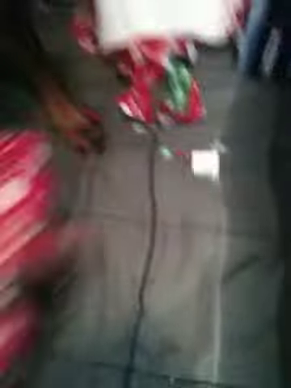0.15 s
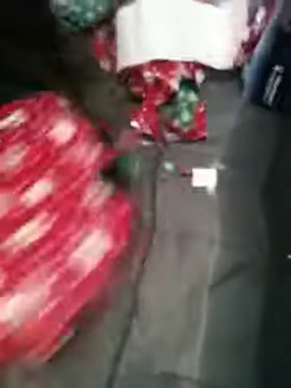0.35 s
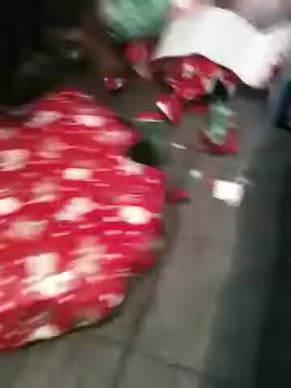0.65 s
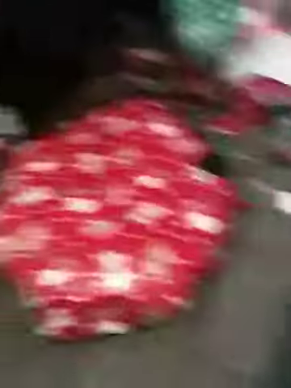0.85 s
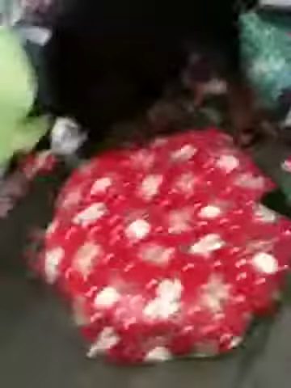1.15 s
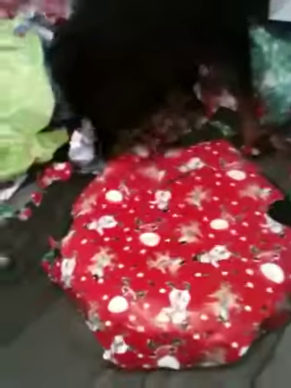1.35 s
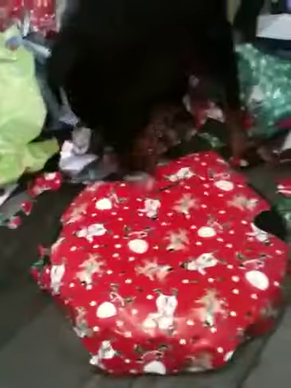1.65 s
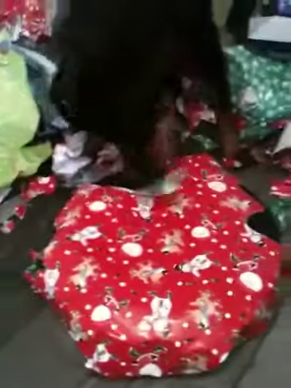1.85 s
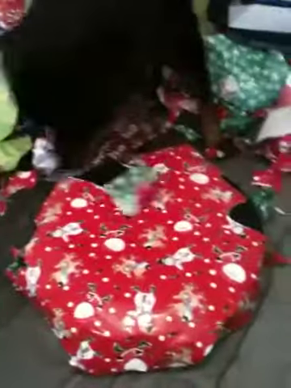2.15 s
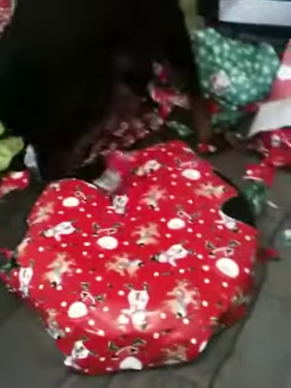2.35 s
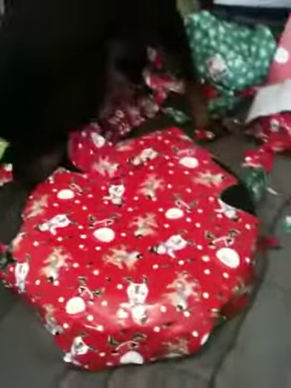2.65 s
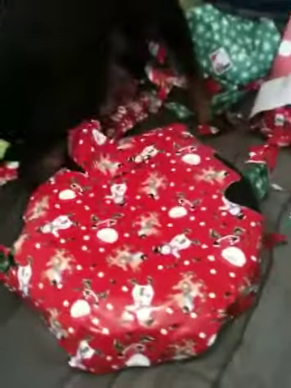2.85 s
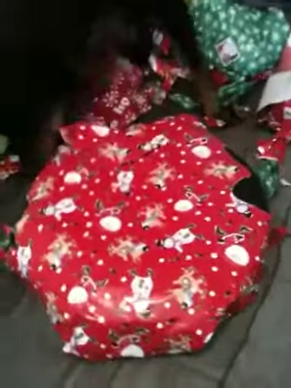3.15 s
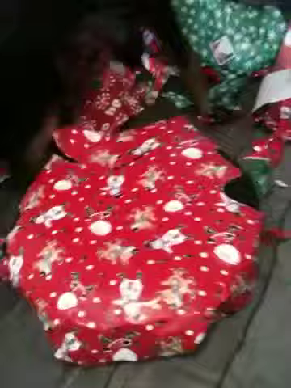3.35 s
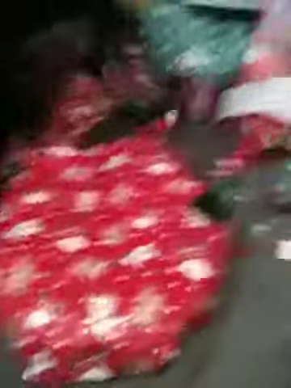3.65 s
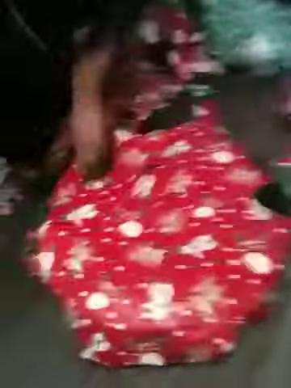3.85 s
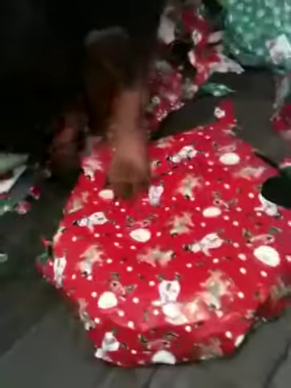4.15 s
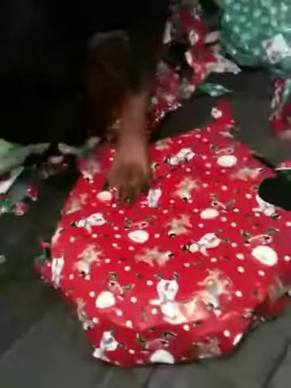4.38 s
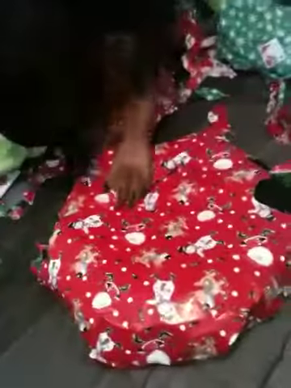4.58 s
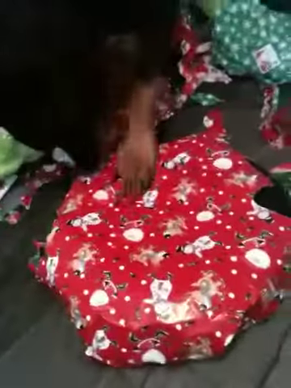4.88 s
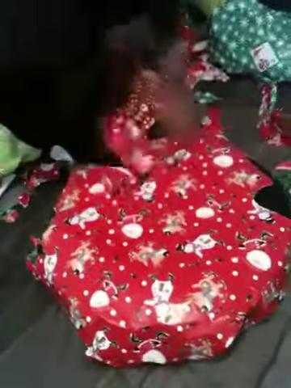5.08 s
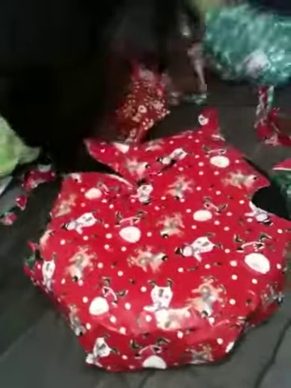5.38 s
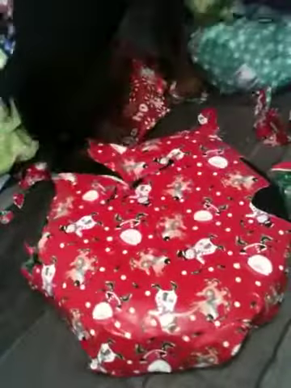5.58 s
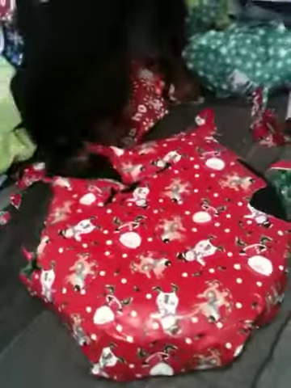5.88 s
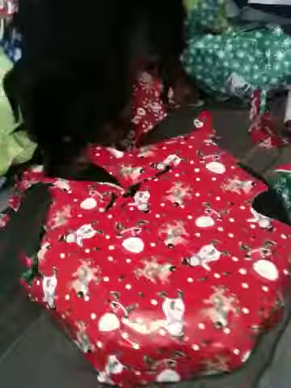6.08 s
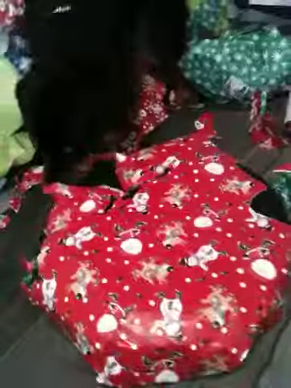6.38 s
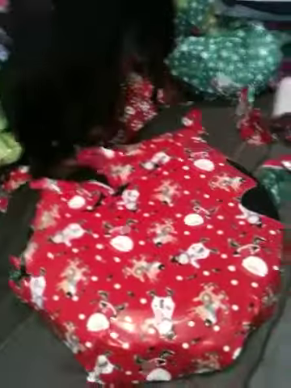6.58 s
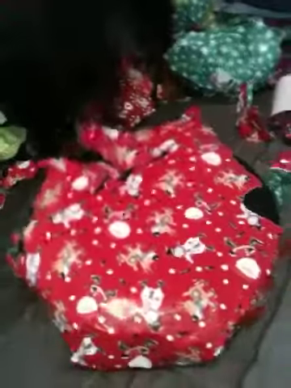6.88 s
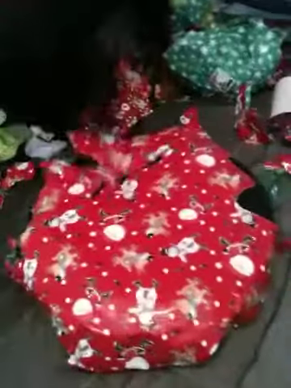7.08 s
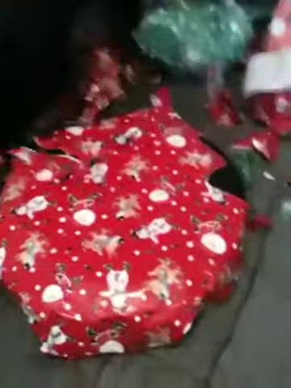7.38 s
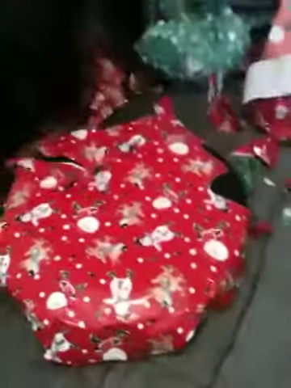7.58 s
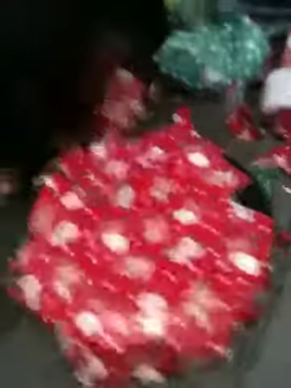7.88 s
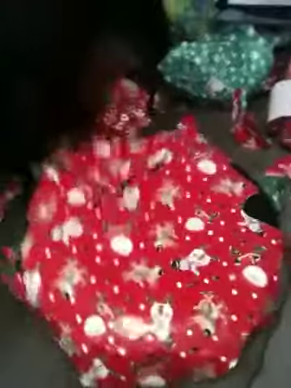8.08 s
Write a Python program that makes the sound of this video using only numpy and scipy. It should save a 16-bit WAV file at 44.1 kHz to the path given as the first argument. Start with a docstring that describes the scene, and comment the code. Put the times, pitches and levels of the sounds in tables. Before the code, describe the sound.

A puppy noses and tears at the wrapping paper of a big present, heard from nearby in a furnished room with little echo. The paper crinkles and snaps right from the start, eases briefly, then crackles and rips from about 1.2 to 2 seconds. After a lull, more crinkles and small pops come from 2.8 seconds onward. The loudest part falls between 4 and 4.6 seconds, when paws slap and crush the taut paper, thumping lightly on the hollow parcel beneath. Short rips and rubbing follow at about 4.7 and 5.1 seconds. Scattered crackles and crease snaps continue to around 7 seconds, go nearly quiet, then return in a last small flurry from 7.8 seconds to just past 8. A faint hiss with a barely audible thin, high electronic whine lies underneath throughout.

```python
"""On a living-room floor, a puppy noses, paws and tears at the wrapping paper of a big present.
The paper crinkles and rips in bursts of tiny cracks, creases snap through and taut folds pop.
Paws slap the stretched sheet, which drums on the hollow parcel beneath.
The furnished room adds a short tail, over a bed of faint hiss and a thin electronic whine."""
import sys
import numpy as np
from scipy import signal
from scipy.io import wavfile
from scipy.ndimage import uniform_filter1d

SR = 44100
rng = np.random.default_rng(int(sys.argv[2]) if len(sys.argv) > 2 else 0)


def wav_out(sig):
    """Save sig, one row per channel (or a flat mono array), as 16-bit PCM at SR to the path in sys.argv[1]."""
    wavfile.write(sys.argv[1], SR, np.round(np.clip(np.atleast_2d(sig).T, -1, 1) * 32767).astype(np.int16))


N = 362943
TIME = np.arange(N) / SR


# rustle bed as the puppy shifts about in the loose paper: (time [s], level [dB])
SHUFFLE_ENVELOPE = [(0, -62.5), (.36, -63), (.55, -66.5), (1.0, -67), (1.45, -63), (1.9, -63), (2.1, -77),
                    (2.7, -86.5), (3.1, -62.5), (3.42, -77), (4.15, -69.5), (4.42, -73), (5.7, -70),
                    (6.2, -66), (6.95, -78.5), (7.2, -81.5), (7.55, -85), (8.2, -61)]
# muzzle and paw strokes that crumple the paper, or rip it when bright:
# (start [s], length [s], level [dB], swell [dB], brightness [dB], push on the parcel [dB re level])
STROKE_CUES = [(0, 0.058, -53.5, -7.5, -4, -4), (0.104, 0.081, -57.5, -2.5, 0, -5),
               (0.214, 0.083, -55, -2, 4.5, -4), (.62, 0.14, -65, -1, -9.5, 3),
               (1.234, 0.11, -54, 10.5, -4.5, -3.5), (1.48, 0.22, -57.5, 7, 4, -5),
               (1.675, 0.17, -53, -6.5, 5, -2.5), (1.849, 0.1, -51.5, -7, 3, -2.5),
               (2.53, 0.012, -67.5, -1, 4, 1.5), (2.87, 0.054, -64.5, -11, -4, -4.5),
               (3.012, 0.035, -58, -6, 4.5, -6), (3.12, 0.11, -54.5, 2, -6.5, -5.5),
               (3.608, 0.028, -54, 3.5, -5.5, -10.5), (3.685, 0.018, -58.5, 0, -0.5, -12),
               (3.884, 0.14, -52.5, 7, -5, -8), (4.022, 0.086, -44.5, 1, -5, -1.5),
               (4.698, .11, -52.5, 5, 6, 3.5), (4.948, 0.074, -63, 3.5, 11, 9),
               (5.059, 0.17, -51.5, 5.5, 1, -5.5), (5.393, 0.038, -63, -3, 6.5, -1),
               (5.485, 0.043, -60, 3, -10.5, -15), (5.57, 0.061, -56.5, -6.5, 0.5, -3),
               (5.786, 0.017, -62, -8, 5, -3.5), (5.882, 0.017, -59, 0, 1, -11),
               (5.978, 0.017, -58.5, 1, -6, -7.5), (6.068, 0.1, -60.5, -7, -9, -13),
               (6.484, 0.014, -56, -1.5, -4, -6), (6.621, .055, -58, -6, -5, -8.5),
               (6.712, 0.02, -50, -4, -11.5, -17), (6.806, 0.033, -48.5, 1.5, -11, -12),
               (6.908, 0.1, -57, -10.5, -3, -4.5), (7.548, .03, -65, -5, -9.5, -7),
               (7.655, 0.056, -66.5, -3.5, -9, -9), (7.807, .04, -53, -3, -7.5, -8.5),
               (7.9, 0.04, -55, 1, -3.5, -29), (8.079, 0.023, -58.5, -7, -3, -17),
               (8.165, 0.026, -59, -3.5, -0.5, -14)]
# the puppy leans on the parcel and rubs it: (start [s], length [s], push [dB])
LEAN_CUES = [(1.99, 0.076, -66), (2.219, 0.029, -66.5), (3.38, 0.22, -73.5), (4.13, .07, -55.5),
             (4.435, 0.034, -64), (7.03, 0.037, -67), (7.475, 0.018, -68.5)]


def handling():
    """The puppy's moves sum to three dB envelopes: crinkle level, brightness and push on the parcel."""
    t = TIME[::40]
    paper_release, push_release = 318.5, 236   # dB per second
    power = from_db(np.interp(t, *np.transpose(SHUFFLE_ENVELOPE))) ** 2
    bright = -2.5 * power   # weighted by power: the loudest move sets the tone
    push = power * from_db(-4.5) ** 2
    for start, length, level_db, swell_db, bright_db, push_db in STROKE_CUES:
        stroke = from_db(level_db) ** 2 * gesture(t, start, length, swell_db, paper_release)
        power += stroke
        bright += stroke * bright_db
        push += from_db(level_db + push_db) ** 2 * gesture(t, start, length, swell_db, push_release)
    for start, length, push_db in LEAN_CUES:
        push += from_db(push_db) ** 2 * gesture(t, start, length, 0, push_release)
    envelopes = 10 * np.log10(power), bright / power, 10 * np.log10(push)
    return [np.interp(TIME, t, envelope) for envelope in envelopes]


def gesture(t, start, length, swell_db, release_db_per_s, attack_db_per_s=483):
    """Power envelope of one move: a quick attack, a hold that swells or slackens, a release."""
    age = t - start
    held_db = swell_db * (np.clip(age / length, 0, 1) - .5)
    fade_db = attack_db_per_s * np.maximum(-age, 0) + release_db_per_s * np.maximum(age - length, 0)
    return from_db(held_db - np.minimum(fade_db, 100)) ** 2


def crinkling(level_db, bright_db, push_db):
    """The harder the paper is pulled, the more cracks a second; the same handling rubs the parcel."""
    per_s = 2400 * from_db(.45 * (level_db + 55))
    cracks = crackle(per_s, spread_db=3.5, clump_db=1.5, clump_hz=130) * from_db(level_db + 3.5)
    sheet = paper(cracks * tautness(), bright_db, scatter_db=3.5, fold_db=1)
    fibres = crackle(per_s, spread_db=3, clump_db=3.5, clump_hz=170) * from_db(level_db + 6)
    sheet += ripping(fibres, bright_db)
    sheet += facets(level_db + 3)
    rubs = crackle(per_s, spread_db=2, clump_db=3, clump_hz=110) * from_db(push_db + 15.5)
    return sheet, parcel(rubs, thud_db=-5, floor_db=-30)


def crackle(per_s, spread_db, clump_db, clump_hz):
    """Tiny cracks in avalanches, many weak and a few strong, with the denser stretches compressed."""
    sizes = from_db(spread_db * np.minimum(rng.exponential(1, N), 5)) * rng.choice([-1, 1], N)
    cracks = sizes * triggers(per_s) * from_db(clump_db * drift(clump_hz))
    slow_power = np.abs(uniform_filter1d(cracks ** 2, size=1800))
    return cracks / np.sqrt(slow_power + 0.029)


# tone of one crack: (frequency [Hz], level [dB])
CRACK_EQ = [(450, -15), (650, -14.5), (900, -5.5), (1300, -5), (1900, 0.5), (2700, -5.5), (3800, 4),
            (5500, -14), (7500, -16.5), (10000, -25), (14500, -18)]
# how far each band follows a crack's brightness: (frequency [Hz], amount [dB per dB])
BRIGHTNESS_TRACKING = [(1300, 0), (3200, 0.52), (7000, 0.97), (13000, 0.79)]
# resonances of the stretched sheet: (frequency [Hz], bandwidth [Hz], level [dB])
SHEET_RESONANCES = [(886, 200, 2.5), (1815, 244, -3.5), (2370, 170, -7), (3860, 1000, -14),
                    (7530, 2400, 2.5)]


def paper(cracks, bright_db, scatter_db=0, fold_db=0):
    """Cracks radiate, coloured by chance and by the shifting folds, then ring in the stretched sheet."""
    direct, at = np.zeros(N), np.flatnonzero(cracks)
    for k, (hz, sos) in enumerate(bands(first=8)):   # 500 Hz and up
        colour_db = scatter_db * rng.standard_normal(N)[at] + fold_db * drift(25)[at]
        tone_db = at_hz(CRACK_EQ, hz) + at_hz(BRIGHTNESS_TRACKING, hz) * bright_db[at]
        band = np.full(N, 1e-18)
        band[at] = cracks[at] * from_db(tone_db + colour_db)
        direct += signal.sosfilt(sos, band) * (-1) ** k
    ringing = 0
    for hz, width, level_db in SHEET_RESONANCES:
        radius = np.exp(-np.pi * width / SR)
        ringing += from_db(level_db) * (1 - radius ** 2) / 2 * resonate(direct, hz, radius)
    return direct + ringing


def ripping(fibres, bright_db, threshold_db=0.5):
    """Parting fibres rasp on the sheet's free edge; the layer fades in on bright strokes."""
    gate = 1 / (1 + from_db(-4 * (bright_db - threshold_db)))
    return filtered(fibres * gate + 1e-18, "band", [2535, 3705])


def facets(level_db, per_s=70, t60_cycles=24.3, count=24):
    """Small facets of the crumpled paper flip at random, each ringing at a pitch set by its size."""
    at = np.flatnonzero(triggers(per_s))
    gains = from_db(level_db + 5.2 * np.clip(rng.standard_normal(N), -2, 2))[at]
    facet, out = rng.integers(0, count, N)[at], np.zeros(N)
    for k, hz in enumerate(np.geomspace(750, 5200, count)):
        flips = np.full(N, 1e-18)
        flips[at] += gains * (facet == k)
        radius = from_db(-60 * hz / (t60_cycles * SR))
        out += resonate(flips, hz, radius, feed=[0, np.sin(2 * np.pi * hz / SR)])
    return filtered(out, "high", 600)


# featured creases snapping through: (time [s], level [dB], brightness [dB])
SNAP_CUES = [(0.024, -31.5, -7.5), (0.108, -28.5, -26), (0.304, -29, -14), (0.471, -48, -7),
             (0.624, -35, -26), (0.919, -43.5, -17), (1.052, -41, -11.5), (1.103, -34, -14),
             (1.229, -34.5, -4.5), (1.323, -24, -23), (1.39, -27.5, -4), (1.453, -28.5, -22),
             (1.602, -31.5, 1), (2.779, -30.5, -10.5), (2.786, -39, -14), (2.909, -45.5, -3),
             (2.938, -36.5, -16), (3.005, -37, -15), (3.1, -25, -32), (3.131, -29.5, -13.5),
             (3.176, -40, -14), (3.238, -33, -37), (3.534, -36, -28), (3.643, -30.5, -18.5),
             (3.817, -39, -31), (4.053, -32, 7.5), (4.108, -34.5, 2), (4.981, -32.5, -8), (5.147, -29, -18),
             (5.202, -27, -28), (5.794, -39.5, 2), (5.8, -36.5, -23), (5.869, -37, -9.5), (5.971, -39, -24),
             (6.391, -36, -32), (6.625, -40, -21), (6.706, -32, -35), (6.802, -33, -24),
             (6.838, -28.5, -44), (7.348, -50.5, -15), (7.809, -29, -16.5), (7.896, -29.5, -13),
             (7.929, -31.5, -16.5), (8.089, -35, -13), (8.195, -35, -11)]


def snapping(level_db, ticks_per_s=8, tick_bright_db=-16, thump_db=-27):
    """Creases flip with a sharp tick and nudge the parcel; random extra ones ride the crinkle level."""
    at = np.flatnonzero(triggers(ticks_per_s))
    tick_db = level_db + 12.5 + 5 * np.clip(rng.standard_normal(N), -2, 2)
    creases = list(SNAP_CUES) + [(i / SR, tick_db[i], tick_bright_db) for i in at]
    cues = sorted((*crease, thump_db) for crease in creases)
    cracks, bright_db, thumps = buckles(cues, shower_db=-6.5, decay_s=0.0051)
    snaps = paper(cracks * from_db(8.5), bright_db + 12)
    return snaps, parcel(thumps * from_db(36.5), thud_db=-4.5, floor_db=-14)


def tautness(duck_db=-1.5, hold_s=.016):
    """Just before a featured crease gives way, the paper holds taut and the crackle ducks."""
    gain = np.ones(N)
    for time, *_ in SNAP_CUES:
        gain[max(int((time - hold_s) * SR), 0):int(time * SR)] = from_db(duck_db)
    return gain


def buckles(cues, shower_db, decay_s):
    """Each buckle is one crack, a dying shower of small ones and a thump for the parcel."""
    cracks, brightness, thumps = np.zeros((3, N))
    age = np.arange(SR // 16) / SR
    for time, level_db, bright_db, thump_db in cues:
        at = int(round(time * SR))
        grains = rng.choice([-1, 1], len(age)) * triggers(2000, len(age))
        shower = grains * from_db(shower_db) * np.exp(-age / decay_s)
        shower[0] = 1   # the leading crack
        cracks[at:at + len(age)] += from_db(level_db) * shower[:N - at]
        brightness[at:] = bright_db
        thumps[at] = from_db(level_db + thump_db)
    return cracks, brightness, thumps


# paw hits on the taut paper: (time [s], level [dB], brightness [dB], thump send [dB])
PAW_CUES = [(1.686, -31, -13, -8.5), (3.371, -46, -19, -14), (4.021, -38.5, 8.5, -9),
            (4.07, -19, -14.5, -9), (4.081, -34.5, 8.5, -27), (4.191, -37.5, -11, -3.5),
            (4.237, -40.5, -9, -18), (4.263, -16.5, -41, -14.5), (4.267, -23, -8, -36),
            (4.275, -30, -45, -3.5), (4.499, -45.5, -12, -3.5), (4.533, -9.5, -28, -19.5),
            (4.538, -33.5, -4, -1), (4.548, -27, 0, -3)]


def pawing():
    """A paw crushes the paper and drums on the parcel."""
    cracks, bright_db, thumps = buckles(PAW_CUES, shower_db=-5, decay_s=0.0037)
    slaps = paper(cracks * from_db(9), bright_db + 14.5)
    return slaps, parcel(thumps * from_db(41.5), thud_db=-16.5, floor_db=-28)


# pitched pops of taut folds: (time [s], level [dB], pitch [Hz], t60 [s])
POP_CUES = [(0.623, -52, 1157, 0.041), (2.780, -40, 850, 0.022), (2.785, -35, 2790, 0.01),
            (3.099, -39, 1180, 0.0091), (3.133, -44, 1940, .03), (3.237, -40.5, 800, 0.0078),
            (3.819, -52, 1820, 0.034), (4.072, -26, 850, 0.014), (4.535, -25.5, 1890, 0.017),
            (5.202, -26, 3720, 0.0074), (5.971, -52, 927, 0.031), (6.388, -53, 1370, .025),
            (6.707, -33, 1470, 0.0052), (6.712, -49, 1750, 0.053), (7.27, -67, 735, 0.045),
            (8.193, -29.5, 1980, 0.0061)]


def popping():
    """A taut fold rings briefly when it gives way."""
    out, age = np.zeros(N), np.arange(SR // 8) / SR
    for time, level_db, hz, t60 in POP_CUES:
        at = int(round(time * SR))
        ring = np.cos(2 * np.pi * hz * age) * from_db(level_db - 60 * age / t60)
        out[at:at + len(age)] += ring[:N - at]
    return filtered(out, "band", [500, 4500])


# body of the hollow parcel: (frequency [Hz], level [dB], t60 [s])
BODY_MODES = [(155.7, -9.5, .1), (184, -2, 0.23), (223.7, -1, 0.067), (266.5, 2, 0.077), (311, 1, 0.15),
              (346.5, 2, 0.06), (445, -3.5, 0.59), (457.4, -8, 0.73), (541, -5, 0.22)]


def parcel(push, thud_db, floor_db):
    """Pushes drum on the parcel's modes, over a dead thud from its skin and a faint one from the floor."""
    skin = filtered(push + 1e-18, "band", [130, 650])
    skin = filtered(skin, "high", 125, order=4)   # too small to radiate deep bass
    body = from_db(thud_db) * skin
    for hz, level_db, t60 in BODY_MODES:
        radius = from_db(-60 / (t60 * SR))
        body += from_db(level_db) * (1 - radius) * resonate(skin, hz, radius)
    return body + from_db(floor_db) * filtered(push + 1e-18, "band", [20, 80])


# reverb time of the furnished room: (frequency [Hz], t60 [s])
ROOM_DECAY = [(200, 0.14), (1000, 0.23), (3000, 0.21), (7000, 0.14), (15000, 0.16)]


def room(x, tail_db, early_db, early_s, spots):
    """Early reflections and a diffuse tail; the sound hops between spots, each with its own echoes."""
    age = np.arange(SR // 3) / SR
    tails = 0
    for hz, sos in bands():
        noise = signal.sosfilt(sos, rng.standard_normal((spots, len(age))))
        tails += noise * from_db(-60 * age / at_hz(ROOM_DECAY, hz))
    tails *= np.minimum(age / 0.011, 1)
    hop = 400   # samples between draws of a spot on the paper
    spot = rng.integers(0, spots, N)[np.arange(N) // hop]
    out = x.copy()
    for k, tail in enumerate(tails):
        early = rng.standard_normal(len(age)) * triggers(3000, len(age))
        early *= np.exp(-age / early_s) * (age > .001)
        response = from_db(tail_db) * tail / np.linalg.norm(tail)
        response += from_db(early_db) * early / np.linalg.norm(early)
        crossfade = np.sin(np.pi / 2 * uniform_filter1d(1. * (spot == k), size=hop))
        out += signal.oaconvolve(x * crossfade, response)[:N]
    return out


# still room and microphone hiss: (frequency [Hz], relative density [dB])
HISS_EQ = [(18, -48), (30, -15.5), (59, -37), (106, -6), (203, 3), (353, 0), (662, -8.5), (816, -4),
           (1790, -7.5), (7780, -14.5), (13500, -14), (14600, -12), (15800, -18)]
# faint electronic whine: (frequency [Hz], level [dB rms])
WHINE_TONES = [(14970, -89), (15030, -89)]


def room_tone(hiss_db=-72):
    """A steady bed of hiss with a thin electronic whine on top."""
    hiss = sum(from_db(at_hz(HISS_EQ, hz)) * signal.sosfilt(sos, rng.standard_normal(N))
               for hz, sos in bands())
    whine = sum(np.sqrt(2) * from_db(db) * np.sin(2 * np.pi * hz * TIME) for hz, db in WHINE_TONES)
    return from_db(hiss_db) * rms_one(hiss) + whine


def from_db(db):
    """Decibels to gain."""
    return 10 ** (np.asarray(db) / 20)


def rms_one(x):
    """Normalise to rms 1."""
    return x / np.sqrt(np.mean(x ** 2) + 1e-20)


def at_hz(curve, hz):
    """Read a curve on a log-frequency axis."""
    frequencies, values = np.transpose(curve)
    return np.interp(np.log(hz), np.log(frequencies), values)


def bands(first=0):
    """Half-octave filter bank, 31 Hz to 16 kHz, as (centre [Hz], filter) from band `first` upward."""
    edges = 500 * 2 ** (np.arange(first - 8, 11) / 2)
    return [(np.sqrt(lo * hi), signal.butter(2, [lo, hi], "band", fs=SR, output="sos"))
            for lo, hi in zip(edges, edges[1:])]


def filtered(x, kind, hz, order=2):
    """Flat-topped filter."""
    return signal.sosfilt(signal.butter(order, hz, kind, fs=SR, output="sos"), x)


def resonate(x, hz, radius, feed=(1, 0, -1)):
    """Two-pole resonator: the nearer the radius is to 1, the longer the ring."""
    return signal.lfilter(feed, [1, -2 * radius * np.cos(2 * np.pi * hz / SR), radius ** 2], x)


def triggers(per_s, samples=N):
    """Random impulses at an average rate."""
    return rng.random(samples) < per_s / SR


def drift(rate_hz):
    """Smooth random modulation at rms 1."""
    knots = rng.standard_normal(N // 20)
    return rms_one(np.interp(TIME * rate_hz, np.arange(len(knots)), knots))


def scene():
    """Three stems over room tone; snaps and slaps on the parcel's near face sit drier than the rustle."""
    level_db, bright_db, push_db = handling()
    rustle, rubs = crinkling(level_db, bright_db, push_db)
    snaps, knocks = snapping(level_db)
    slaps, thumps = pawing()
    sheet = room(rustle + popping(), tail_db=-5, early_db=-2, early_s=0.0076, spots=12)
    hits = room(snaps + slaps, tail_db=-4, early_db=-6, early_s=0.0047, spots=10)
    body = room(rubs + knocks + thumps, tail_db=-8, early_db=-7, early_s=0.0065, spots=4)
    return (sheet + hits + body + room_tone())[None]


def record(dry):
    """A steep high cut at 15.9 kHz."""
    return signal.sosfilt(signal.ellip(10, .2, 70, 15900, fs=SR, output="sos"), dry)


dry = scene()
out = record(dry)
wav_out(out)
```